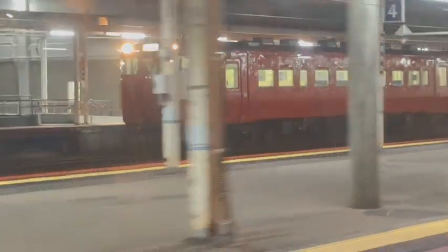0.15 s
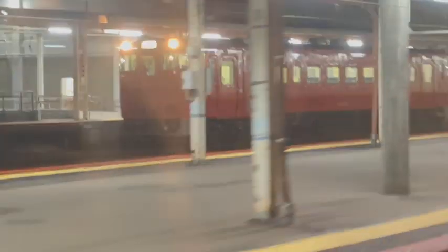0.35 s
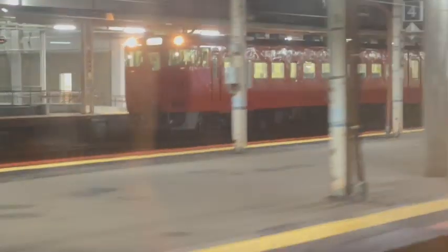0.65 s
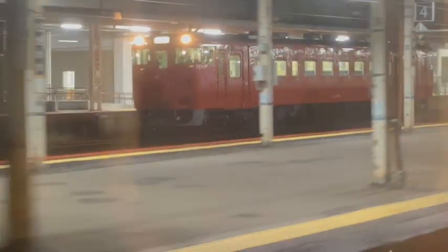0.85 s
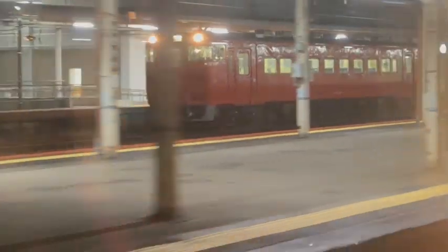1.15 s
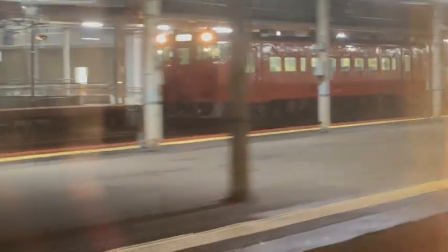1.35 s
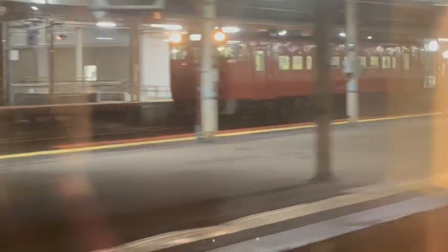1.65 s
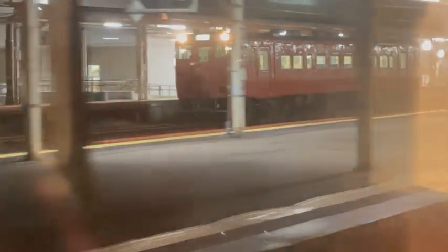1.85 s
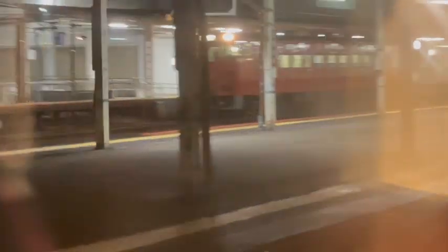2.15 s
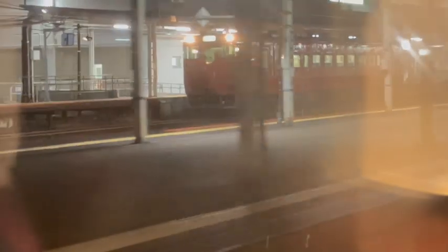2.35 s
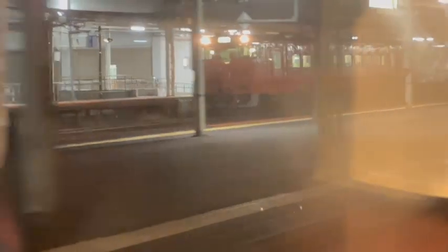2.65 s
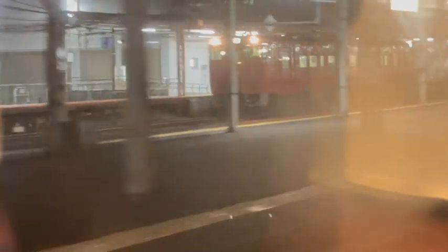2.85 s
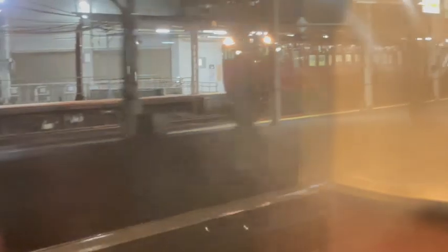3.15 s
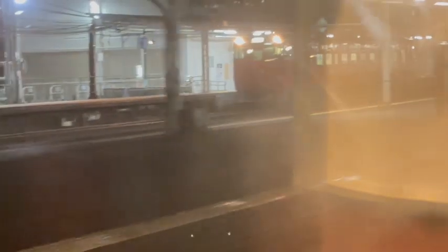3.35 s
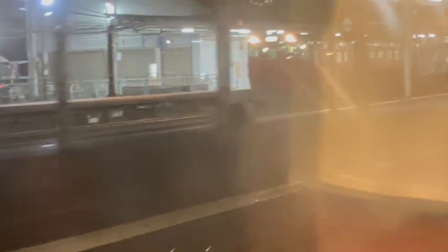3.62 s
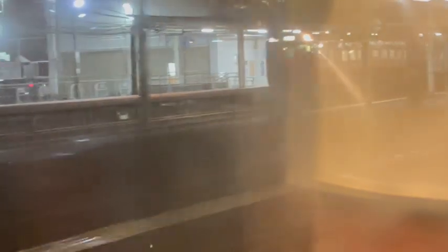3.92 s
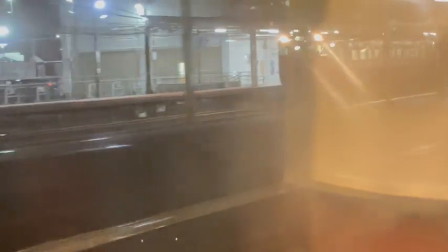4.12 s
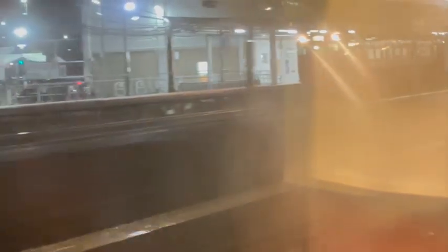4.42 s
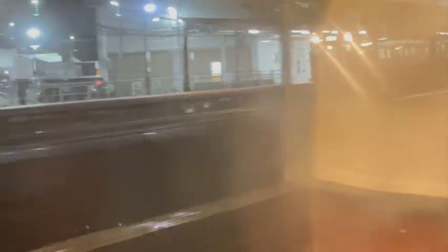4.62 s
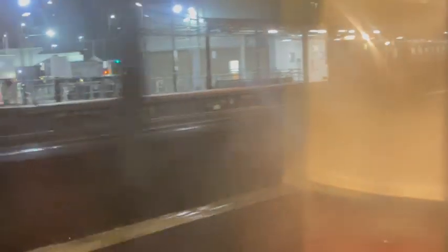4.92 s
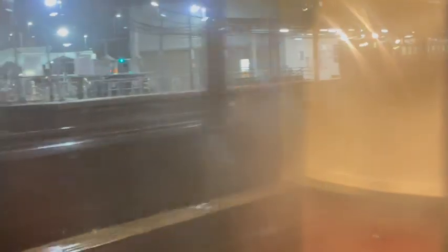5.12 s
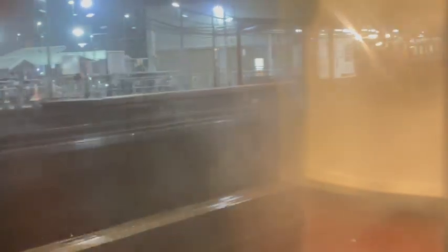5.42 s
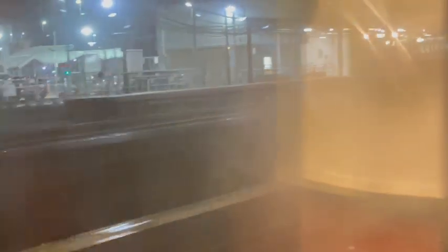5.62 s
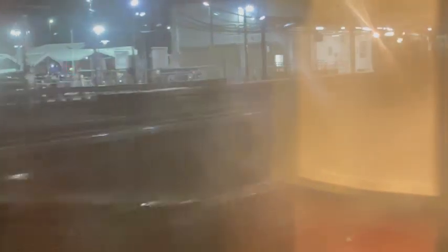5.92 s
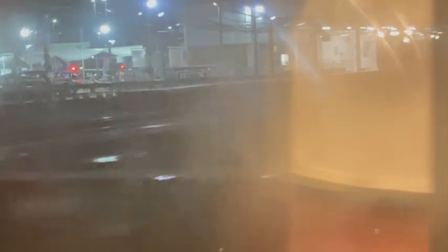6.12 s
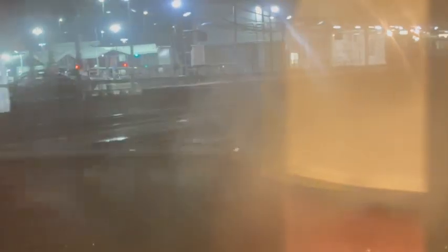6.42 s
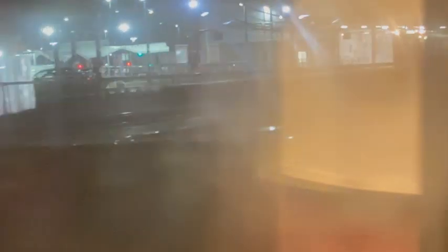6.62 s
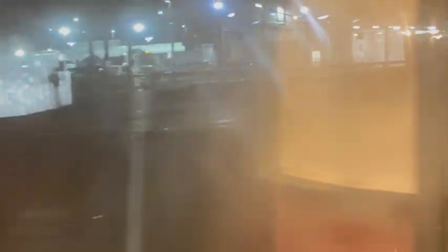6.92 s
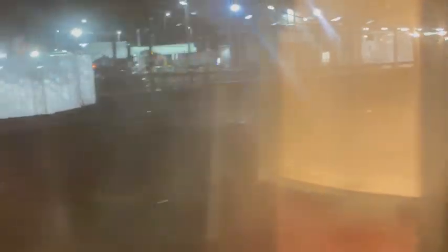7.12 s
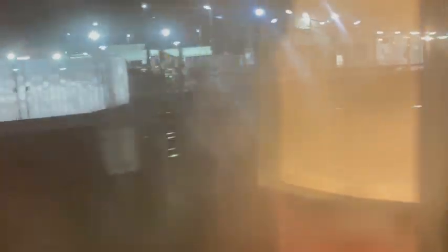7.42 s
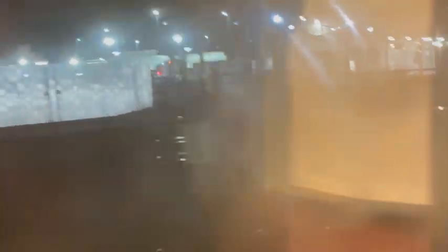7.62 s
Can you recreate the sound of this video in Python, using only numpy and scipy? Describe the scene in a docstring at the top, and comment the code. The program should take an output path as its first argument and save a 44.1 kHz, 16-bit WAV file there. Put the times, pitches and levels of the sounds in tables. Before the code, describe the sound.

Heard from a window seat inside a diesel railcar rolling out of a station: continuous low rumble, cabin boom and wavering engine drone. A heavy double wheel thud comes early, a weaker single one follows, then two more pairs at even spacing. Tiny dry ticks and faint creaks sound close to the microphone, mostly in the first two seconds; a loose metal fitting snaps once near the end.

```python
"""Inside a diesel railcar rolling out of a station at night.
Shaped noise makes the floor's rumble, the cabin's boom and the wheels' roar; wavering firing
harmonics, narrow resonances and thin whines make the drone of the drive. Pairs of wheels thud over
rail joints roughly every 2.7 s, with single weaker thuds between, each a noise burst with ringing modes.
Small ticks and stick-slip creaks ring close to the microphone, and a loose metal fitting snaps once."""
import sys
import numpy as np
from scipy import signal
from scipy.fft import rfft, irfft, next_fast_len
from scipy.io import wavfile
from scipy.ndimage import uniform_filter1d

SR = 44100
rng = np.random.default_rng(int(sys.argv[2]) if len(sys.argv) > 2 else 0)


def transcribe(u):
    """Save the signal u as a 16-bit wav file named by the first command-line argument.

    u: samples, shape (n,) or (channels, n), limited to [-1, 1]; the rate is SR.
    q: integer samples, one column per channel.
    """
    v = np.clip(np.atleast_2d(u).T, -1, 1)
    q = np.round(v * 32767).astype(np.int16)
    wavfile.write(sys.argv[1], SR, q)


N = 342657
T = np.arange(N) / SR

# Wheels on rail joints. Each row: start in seconds, thud level in dB, rise in seconds, ring t60 in
# seconds at 250 Hz, tilt in dB per octave, grinding level in dB, jolt of the floor in dB.
JOINTS = [(1.226, -25.5, 0.026, 0.54, -2, -52.5, -31.5), (1.512, -24.5, 0.027, 0.8, -2.5, -49, -29.5),
          (3.085, -28, 0.013, 0.25, -6.5, -63.5, -29), (4.218, -28.5, 0.008, 0.49, -2, -62, -25.5),
          (4.43, -26, 0.023, 0.5, -2.5, -54.5, -35), (5.67, -51, 0.016, 0.19, -5, -73, -33.5),
          (6.616, -25, 0.012, 0.4, -4, -54.5, -40), (6.796, -27, 0.0063, 0.8, -3, -51, -30)]
# The cabin's hum around 200 Hz. Each row: time in seconds, level in dB against its usual level.
HUM_LEVEL = [(0, 0.5), (.6, -5), (1.0, -0.5), (1.9, 1.5), (2.15, -1), (2.45, 4.5), (3.1, -3), (3.7, -0.5),
             (4.8, -3), (5.4, -2.5), (6.3, 0), (6.75, 1.5), (7.15, -7), (7.77, -4)]
# The cabin's dense modes: one random ripple over frequency, shared by every noise, from 0 Hz to SR / 2.
RIPPLE = rng.standard_normal(1500)
# A jolt builds up in the floor and dies away.
FLOOR_RISE_S, FLOOR_T60_S = 0.027, 3.45
RUMBLE_DB = -35  # steady rumble of the floor


def amp(db):
    """Decibels to gain."""
    return 10 ** (np.asarray(db) / 20)


def evened(x):
    """Scales to rms 1."""
    return x / np.sqrt(np.mean(x ** 2) + 1e-20)


def read(points, hz):
    """Reads a curve over frequency on a log-frequency axis."""
    f, value = np.transpose(points)
    return np.interp(np.log(hz + 1), np.log(f + 1), value)


def follow(rows):
    """Reads a curve over time at every sample."""
    return np.interp(T, *np.transpose(rows))


def add(mix, s, sound):
    """Mixes a sound in at time s in seconds."""
    part = mix[..., max(round(s * SR), 0):][..., :sound.shape[-1]]
    part += sound[..., :part.shape[-1]]


def wander(hz):
    """Slow random drift of rms 1, fading out above the given rate."""
    f = np.fft.rfftfreq(N, 1 / SR)[:2000]
    real, imaginary = rng.standard_normal((2, len(f)))
    slow = irfft((real + 1j * imaginary) / (1 + (f / hz) ** 4), 16384)
    return evened(np.interp(T / T[-1], np.linspace(0, 1, len(slow)), slow))


def field(shape_db, size, ripple_db=1.5):
    """Diffuse noise of a given spectrum, rippled by the cabin's modes, at the two microphone ports; rms 1."""
    # Likeness of the ports. Each row: frequency in Hz, left-right correlation.
    likeness = [(40, .999), (70, .992), (130, .98), (280, .945), (440, .75), (620, -.25), (900, .25),
                (1500, -.15), (2000, .5), (3100, .85), (4500, .97), (9000, .95), (15000, .93)]
    # Balance of the ports. Each row: frequency in Hz, left minus right in dB.
    balance = [(400, 0), (700, .5), (1290, -5), (2000, -1.7), (3500, 0)]
    # How strongly the cabin's modes stand out. Each row: frequency in Hz, share of the full ripple.
    ripple_share = [(60, 0), (400, 1), (1800, 1), (3000, .35)]
    n = next_fast_len(size, True)
    hz = np.fft.rfftfreq(n, 1 / SR)
    a, b = np.exp(2j * np.pi * rng.random((2, len(hz))))
    same = np.clip(read(likeness, hz), -1, 1)
    mid, side = a * np.sqrt(1 + same), b * np.sqrt(1 - same)
    lean = amp(read(balance, hz) / 2)
    ports = np.array([(mid + side) * lean, (mid - side) / lean])
    ripple = np.interp(hz, np.linspace(0, SR / 2, len(RIPPLE)), RIPPLE) * read(ripple_share, hz)
    return evened(irfft(ports * amp(shape_db(hz) + ripple_db * ripple), n)[:, :size])


def steadied(x, seconds):
    """Smooths out the swells of a noise that are slower than the given time."""
    power = uniform_filter1d((x ** 2).mean(0), int(seconds * SR) + 1)
    return x / np.sqrt(abs(power) + 1e-9)


def jolts(rise_s, t60_s):
    """Strength of the shaking left by the rail joints: each jolt builds up and dies away, and their powers add."""
    t = T[::64]
    power = np.zeros(len(t))
    for s, *_, jolt_db in JOINTS:
        age = np.maximum(t - s, 0)
        power += (amp(jolt_db - 60 * age / t60_s) * (1 - np.exp(-age / rise_s))) ** 2
    return np.interp(T, t, np.sqrt(power))


def rolling(heave_sway_db=3.0, rumble_sway_db=1.4, cabin_jolt_db=-14, cabin_share=0.16, flutter_db=0.76):
    """Heave, floor rumble and cabin boom are noises that swell after each joint; the wheels roar with a slight flutter."""
    # Spectra of the body's heave, the floor's rumble, the cabin's boom and the wheels' roar.
    # Each row: frequency in Hz, level in dB per Hz.
    heave_spectrum = [(12, -40), (22, -27.5), (32, -11), (40, -7.5), (49, -1.5), (55, 0.5), (68, -26.5),
                      (120, -69), (400, -130)]
    rumble_spectrum = [(25, -45.5), (44, -19), (54, 0.5), (72, 2.5), (86, -1.5), (104, -3.5), (128, -7.5),
                       (170, -21), (300, -75), (1000, -130)]
    cabin_spectrum = [(60, -23), (115, -1.5), (148, 1.5), (167, -4), (208, -2), (229, -6), (252, -5),
                      (300, -7.5), (340, -8), (410, -11), (520, -19.5), (700, -34), (1500, -68),
                      (4000, -130)]
    roar_spectrum = [(200, 2), (450, 4), (620, 6), (830, 0), (1200, -3.5), (1750, -4), (2200, -14),
                     (2550, -17), (2900, -21.5), (4200, -23.5), (5200, -27), (6800, -25.5), (8500, -39),
                     (10000, -37), (11500, -46.5), (16000, -56.5)]
    # The bass surges and dips briefly. Each row: centre in seconds, half width in seconds, change in dB.
    surges = [(.31, 0.034, 6.5), (1.08, 0.11, -5.5), (1.73, 0.046, -8.5), (2.04, 0.075, -3.5),
              (2.42, 0.099, 0.5), (3.03, 0.045, -0.5), (3.43, 0.13, 1.5), (5.005, 0.077, -19),
              (5.95, .07, 3)]
    heave_db, cabin_db, roar_db = -40.5, -37, -48.5  # steady running levels

    floor = jolts(FLOOR_RISE_S, FLOOR_T60_S)
    body = amp(-12) * jolts(rise_s=0.11, t60_s=3.7)  # on its springs: slower and weaker than the floor
    surge = amp(sum(db * np.exp(-((T - s) / width) ** 2) for s, width, db in surges))

    heave = steadied(field(lambda hz: read(heave_spectrum, hz), size=N), 0.39)
    heave = heave * np.hypot(amp(heave_db), body) * amp(heave_sway_db * wander(3.5))
    rumble = steadied(field(lambda hz: read(rumble_spectrum, hz), size=N), 0.11)
    rumble = rumble * np.hypot(amp(RUMBLE_DB), floor) * amp(rumble_sway_db * wander(16))

    # the boom follows the cabin's hum only in part
    boom_level = np.hypot(amp(cabin_db + cabin_share * follow(HUM_LEVEL)), amp(cabin_jolt_db) * floor)
    boom = steadied(field(lambda hz: read(cabin_spectrum, hz), size=N), 0.34) * boom_level
    roar = field(lambda hz: read(roar_spectrum, hz), size=N) * amp(roar_db + flutter_db * wander(30))
    return surge * (heave + rumble) + boom + roar


def whines(waver=0.00894, fade_db=3):
    """Thin tones of the drive that flutter in pitch and fade in and out; each port hears its own phase."""
    # Each row: frequency in Hz, level in dB.
    tones = [(876, -69), (1077, -69)]
    out = np.zeros((2, N))
    port_phase = np.array([[0], [np.pi / 3]])
    for hz, db in tones:
        turns = np.cumsum(hz * (1 + waver * wander(12))) / SR
        level = np.sqrt(2) * amp(db + fade_db * wander(3.6))
        out += level * np.sin(2 * np.pi * turns + port_phase)
    return out


def engine(firing_hz=48, waver=0.00507, throb_db=3.0, hum_jolt_db=-15, drone_sway_db=2.0):
    """Firing harmonics that waver a little, and narrow resonances; the low ones hum louder as the floor shakes."""
    # Engine lines. Each row: multiple of the firing rate, level in dB.
    orders = [(1, -47), (2, -45), (4, -43), (7, -52)]
    # Hollow tones of the cabin and running gear. Each row: centre in Hz, half width in Hz
    # where the resonance is 6 dB down, level in dB.
    drones = [(98.2, 4.8, -42), (155.7, 7.4, -45.5), (189.7, 5.5, -43.8), (248.2, 4.9, -51), (265, 3, -53),
              (324.2, 5.6, -52), (336.9, 10, -49.5), (882, 12, -65.5), (913, 9.2, -68.5), (1626, 71, -67)]
    # The cabin's upper hum around 330 Hz. Each row: time in seconds, level in dB against its usual level.
    upper_hum_level = [(0, -3), (.6, -4), (1.1, -6), (1.7, 1), (2.3, -6.5), (2.7, 2), (3.6, 0), (4.7, 1.5),
                       (5.4, -1.5), (6.1, 3), (6.5, 0), (7.25, 3.5), (7.77, -4)]

    shaking = jolts(FLOOR_RISE_S, FLOOR_T60_S) * amp(hum_jolt_db - RUMBLE_DB)
    low_swell = amp(follow(HUM_LEVEL)) * np.hypot(1, shaking)
    upper_swell = amp(follow(upper_hum_level))
    turns = np.cumsum(firing_hz * (1 + waver * wander(1.488))) / SR
    out = np.zeros((2, N))
    for order, db in orders:
        level = np.sqrt(2) * amp(db + throb_db * wander(4.7))
        line = level * np.sin(2 * np.pi * (round(order) * turns + rng.random()))
        out += line * (low_swell if order * firing_hz < 300 else upper_swell)
    for centre, width, db in drones:
        hum = field(lambda hz: -20 * np.log10(1 + ((hz - centre) / width) ** 2), size=N)
        swell = low_swell if centre < 300 else upper_swell if centre < 500 else 1
        out += amp(db + drone_sway_db * wander(2.9)) * steadied(hum, .25) * swell
    return out


def tick_ring(knock_db, edge_db=0, contact_s=0.0003):
    """The short ring of a tick: a duller touch brings out low modes, a harder one the top, and each touch varies."""
    # Modes of a tick. Each row: frequency in Hz, level in dB, t60 in seconds.
    modes = [(660, 0.5, 0.0079), (1050, -1.5, 0.012), (1376, -1.5, 0.011), (1740, -2, 0.0081),
             (2150, -11.5, 0.007), (2970, -12, 0.01), (3960, -6.5, 0.0068), (4400, -7, 0.011),
             (5420, -9.5, 0.0095), (6900, -2, 0.0092), (8220, -11.5, 0.011), (9800, -6.5, 0.0034),
             (13600, -10.5, 0.002), (15300, -17.5, .002)]
    t = np.arange(1024) / SR
    hz, db, t60 = np.transpose(modes)[:, :, None]
    strength, detune = rng.standard_normal((2, len(hz), 1))
    colour_db = knock_db * (hz < 2500) + edge_db * (hz > 11000) + 1.4 * strength
    level = amp(db + colour_db - 60 * t / t60)
    turns = hz * (1 + 0.019 * detune) * t + rng.random(hz.shape)
    return np.minimum(t / contact_s, 1) * (level * np.sin(2 * np.pi * turns)).sum(0)


def ticks(tick_db=-4.0, knock_db=2.0, dullness=0.57, hardening=.9, soft_tick_db=-41):
    """Single sharp ticks near the microphone, alone or in clusters; louder ones have a brighter edge."""
    # Each row: time in seconds, level in dB before the common tick level,
    # low knock against the treble in dB before the dullness share.
    touches = [(0.0095, -47.5, 6), (0.116, -41.5, 3), (0.22, -37, 1), (0.2345, -47, 8), (0.2475, -52, 6),
               (0.276, -43.5, 5), (0.355, -36, -7), (0.397, -53, 8), (0.4389, -54, 9), (0.4594, -50.5, 12),
               (0.5263, -48.5, 13), (0.5452, -51, 14), (0.5756, -47, 7), (0.597, -42, 4), (1.1222, -40, 2),
               (1.6324, -37.5, -7), (1.742, -48.5, 16), (1.8654, -45, 8), (1.8805, -45, 11),
               (1.891, -48, 0), (1.903, -44, -9), (1.9315, -39, -14), (1.949, -46, 5.5), (2.102, -38.5, 1),
               (2.107, -42, 2), (2.117, -50, 0), (2.1243, -46, 4), (2.151, -50, 0), (2.159, -40, 4),
               (2.1837, -41, 5), (2.1935, -49, 0), (2.2084, -47, 9), (2.3751, -41, 0), (2.4492, -42.5, 10),
               (3.027, -36.5, -7), (3.4324, -42.5, 0), (3.9037, -36.5, -1), (4.8559, -34, -3),
               (5.085, -41, 1), (5.573, -43.5, 5), (6.0745, -40.5, 2), (6.337, -44, 8), (7.516, -31.5, -7)]
    out = np.zeros(N)
    for s, db, low_db in touches:
        ring = tick_ring(dullness * low_db + knock_db, hardening * (db - soft_tick_db))
        add(out, s + .0005, amp(db + tick_db) * ring)
    return out


def creaks(creak_db=3.5, slips_per_s=380, spread_db=3.5, clump_db=2.0, knock_db=5):
    """Spells of tiny stick-slip steps, which ring the same modes as the ticks."""
    # Each row: start in seconds, end in seconds, level in dB before the common creak level.
    spells = [(0.206, 0.324, -58.5), (0.363, 0.635, -65), (1.53, 1.677, -60.5), (1.68, 1.975, -61),
              (2.094, 2.22, -59), (6.035, 6.107, -60)]
    slips = (rng.random(N) < slips_per_s / SR) * amp(spread_db * np.minimum(rng.exponential(1, N), 3))
    # six contact points slip independently, each with its own colour
    contact = rng.integers(0, 6, N)
    creak = np.zeros(N)
    for k in range(6):
        creak += signal.oaconvolve(slips * (contact == k), tick_ring(knock_db))[:N]
    creak = evened(evened(creak) * amp(clump_db * wander(35)))  # the slips come in uneven clumps
    out = np.zeros(N)
    for start, end, db in spells:
        arch = np.sqrt(abs(np.sin(np.pi * np.clip((T - start) / (end - start), 0, 1))))
        out += creak * amp(db + creak_db) * arch
    return out


def snap(s=6.7447, crack_db=-32, crack_t60=0.021, tail_db=-36, tail_t60=.17, rise=0.003,
         dull_hz=12500, contact_s=.0005):
    """A loose metal fitting snaps to and chatters briefly; each contact rings it, and the cabin answers more dully."""
    # Spectrum of the crack. Each row: frequency in Hz, level in dB per Hz.
    crack_spectrum = [(150, -14), (500, 8.5), (1000, 2), (1500, 3), (2150, 3), (2900, -7.5), (4300, -10),
                      (5900, -6.5), (7000, -9), (9000, -12.5), (13000, -21), (16000, -18)]
    # Modes of the fitting. Each row: frequency in Hz, level in dB, t60 in seconds.
    modes = [(620, -44, 0.03), (885, -48, 0.052), (1174, -45, 0.055), (1490, -47, .04), (1825, -48, 0.039),
             (2130, -40, .032), (2495, -49, 0.034), (3520, -56, .02), (4230, -50, .02), (5150, -52, .025),
             (6000, -47.5, .022), (6800, -51, .04), (8280, -57, 0.066), (8931, -60, .03)]
    # The fitting strikes, seats and chatters. Each row: time in seconds, level in dB, tilt in dB per octave.
    hits = [(6.7472, -2, 2.5), (6.7498, -5, -2), (6.7615, -6, -1), (6.7785, -11, -11)]
    out, t = np.zeros((2, N)), np.arange(16384) / SR
    after = np.maximum(t - rise, 0)
    crack = field(lambda hz: read(crack_spectrum, hz), size=len(t))
    crack = crack * amp(crack_db - 60 * after / crack_t60)
    # the tail loses a further 3 dB at dull_hz
    tail = field(lambda hz: read(crack_spectrum, hz) - 3 * (hz / dull_hz) ** 2, size=len(t))
    tail = tail * amp(tail_db - 60 * after / tail_t60)
    add(out, s, (crack + tail) * np.minimum(t / rise, 1) ** 2)
    hz, db, t60 = np.transpose(modes)[:, :, None]
    for at, hit_db, tilt_db in hits:
        level = amp(hit_db + db + tilt_db * np.log2(hz / 2000) - 60 * t / t60)
        ring = (level * np.sin(2 * np.pi * (hz * t + rng.random(hz.shape)))).sum(0)
        add(out, at, np.minimum(t / contact_s, 1) * ring)
    return out


def booms():
    """Body panels and cabin air, set going by the joints and the rocking that follows, ring as decaying sines."""
    # Each row: start in seconds, frequency in Hz, level in dB, rise in seconds, t60 in seconds.
    resonances = [(1.234, 190.6, -19.5, 0.017, 0.39), (1.341, 100, -22, 0.015, 0.55),
                  (1.43, 108.5, -11, 0.01, 0.2), (1.535, 92.8, -15, 0.021, 0.42),
                  (1.57, 58, -15, 0.016, 0.21), (1.699, 101.2, -21.5, 0.015, 0.35),
                  (3.09, 177.6, -20, 0.019, 0.24), (3.135, 59, -16, 0.014, 0.29),
                  (3.275, 59.5, -13.5, 0.018, 0.23), (4.216, 372, -17, 0.0073, 0.079),
                  (4.224, 188.6, -12.5, 0.039, 0.56), (4.375, 189.7, -23, .015, .3),
                  (4.246, 96.4, -19.5, .01, 0.28), (4.45, 121.4, -14.5, 0.0087, 0.2),
                  (5.671, 145, -17, 0.015, 0.34), (6.619, 184.2, -27, 0.017, 0.31),
                  (6.681, 64, -20, 0.012, 0.28), (6.8, 136.6, -19, 0.0086, .22),
                  (6.95, 62.2, -19, 0.025, 0.48)]
    out, t = np.zeros((2, N)), np.arange(32768) / SR
    for s, hz, db, rise, t60 in resonances:
        level = amp(db - 60 * t / t60) * (1 - np.exp(-t / rise))
        add(out, s, level * np.sin(2 * np.pi * hz * t))
    return out


def blows(contact_s=0.0028, vary_db=1.5):
    """Each blow of a wheel rings the bogie and the floor, a little differently every time."""
    # Separate blows within the thuds, as the wheel drops, strikes the next rail and rebounds.
    # Each row: time in seconds, level in dB, tilt in dB per octave.
    strikes = [(1.238, -26.5, 0.5), (1.256, -27.5, -0.5), (1.281, -26, -1), (1.515, -23, 3),
               (1.536, -22.5, 0), (1.549, -24, -1), (1.574, -22.5, -5.5), (1.618, -27, -4),
               (4.2184, -28, 1), (4.256, -30, -4), (4.439, -23, -0.5), (4.459, -24, -5), (4.494, -28, -0.5),
               (6.621, -22.5, 1.5), (6.638, -21, -0.5), (6.667, -27, -0.5), (6.7989, -22.5, 1.5),
               (6.8147, -21, 2.5), (6.867, -25, -2.5), (6.899, -29, 0)]
    # Modes of the bogie and floor. Each row: frequency in Hz, level in dB, t60 in seconds.
    modes = [(87, -6.5, .1), (138, -2, 0.1), (186.7, 0.5, .085), (260, 1.5, 0.069), (321, -1, 0.071),
             (385, -3, .06), (447, -9.5, .055), (664, -18.5, .04), (846, -23.5, 0.045)]
    out, t = np.zeros(N), np.arange(8192) / SR
    hz, db, t60 = np.transpose(modes)[:, :, None]
    for s, blow_db, tilt_db in strikes:
        strength, detune = rng.standard_normal((2, len(hz), 1))
        level = amp(blow_db + db + tilt_db * np.log2(hz / 250) + vary_db * strength - 60 * t / t60)
        ring = (level * np.sin(2 * np.pi * hz * (1 + 0.03 * detune) * t)).sum(0)
        add(out, s, np.minimum(t / contact_s, 1) * ring)
    return out


def joints(damping=0.11, grind_rise=0.035):
    """Each wheel drops into the gap and grinds over the rail end: noise bursts whose higher bands die sooner."""
    # Spectra of the thud and of the grinding. Each row: frequency in Hz, level in dB per Hz.
    thud_spectrum = [(35, -39.5), (70, -14.5), (120, -2), (200, 0), (260, -1), (340, -3.5), (430, -6),
                     (560, -19.5), (900, -24.5), (1700, -49.5), (4000, -100)]
    grind_spectrum = [(300, -28), (700, 8.5), (1100, 3), (1700, -1), (2700, -10.5), (4500, -15.5),
                      (7000, -20), (10000, -34), (16000, -55)]
    out, t = np.zeros((2, N)), np.arange(32768) / SR
    for s, db, rise, t60, tilt_db, grind_db, _ in JOINTS:
        def thud_shape(hz):
            return read(thud_spectrum, hz) + tilt_db * np.log2(np.maximum(hz, 150) / 250)

        thud = steadied(field(thud_shape, size=len(t)), 0.0091)
        # each band decays at its own rate
        hz, at, bands = signal.stft(thud, SR, nperseg=512)
        band_t60 = t60 * (np.clip(hz, 100, 700) / 250) ** -damping
        decay = amp(-60 * np.maximum(at - rise, 0) / band_t60[:, None])
        thud = signal.istft(bands * decay, SR, nperseg=512)[1][:, :len(t)]
        add(out, s, amp(db) * thud * np.sin(np.pi / 2 * np.minimum(t / rise, 1)))
        grind = field(lambda hz: read(grind_spectrum, hz), size=len(t))
        add(out, s, amp(grind_db) * grind * t / grind_rise * np.exp(1 - t / grind_rise))
    return out


def scene():
    """Everything heard at the window seat."""
    soft_start = np.minimum(T / .004, 1)
    background = rolling() + whines() + engine()
    details = ticks() + creaks() + snap()
    wheels = booms() + blows() + joints()
    return soft_start * (background + details + wheels)


def record(dry, edge_hz=16200):
    """The treble reaches the two ports out of step; then the band limit."""
    # Phase between the ports, opposed at two treble frequencies. Each row: frequency in Hz, left's lead in radians.
    port_phase = [(1900, 0), (3100, .6), (4000, .1), (6200, .15), (7050, 1.57), (7450, 3.14), (7950, 5.3),
                  (8500, 6), (9900, 4.7), (11300, 3.14), (13000, 1.57), (15700, -1.57)]
    n = next_fast_len(N + 4096, True)
    # half of the lead goes to each port
    turn = np.exp(.5j * read(port_phase, np.fft.rfftfreq(n, 1 / SR)))
    heard = irfft(rfft(dry, n) * np.array([turn, 1 / turn]), n)[:, :N]
    band_limit = signal.firwin(511, edge_hz, window=("kaiser", 9), fs=SR)
    return signal.oaconvolve(heard, band_limit[None], "same")


dry = scene()
out = record(dry)
transcribe(out)
```